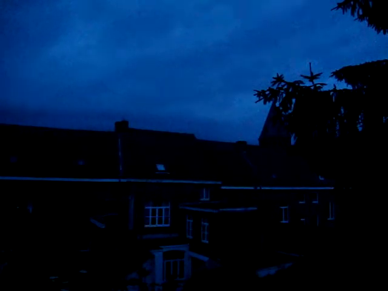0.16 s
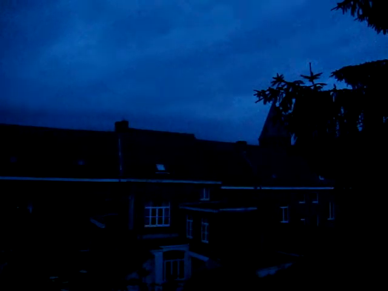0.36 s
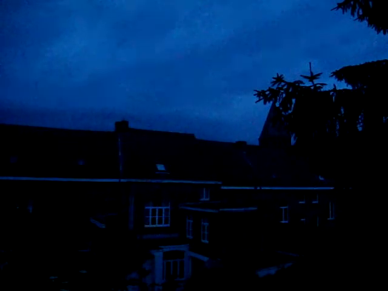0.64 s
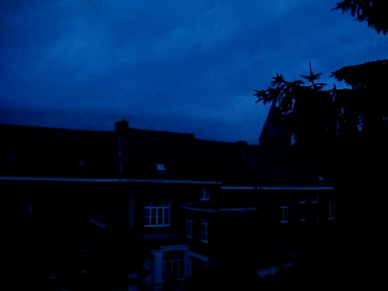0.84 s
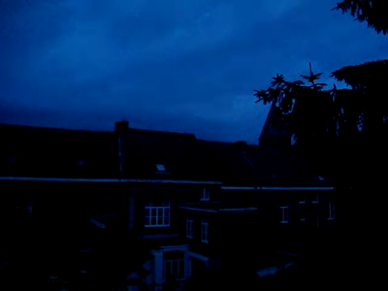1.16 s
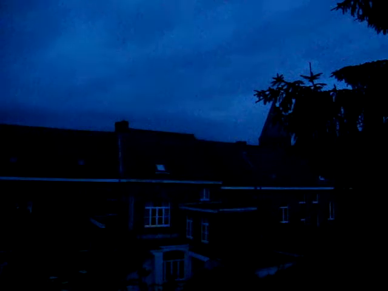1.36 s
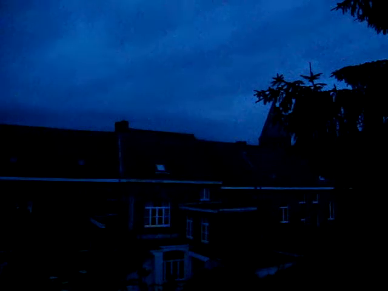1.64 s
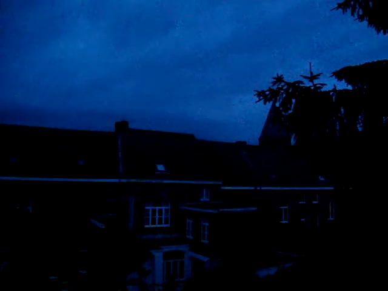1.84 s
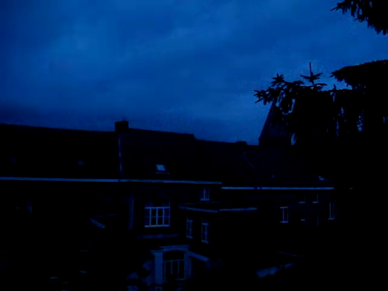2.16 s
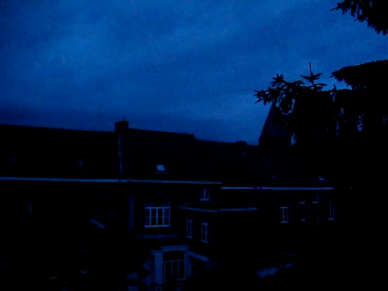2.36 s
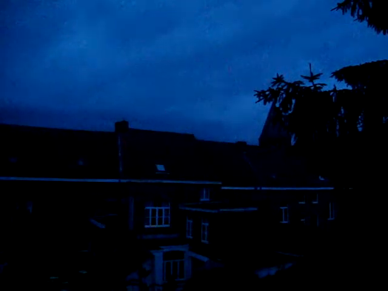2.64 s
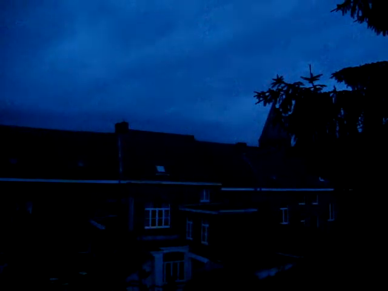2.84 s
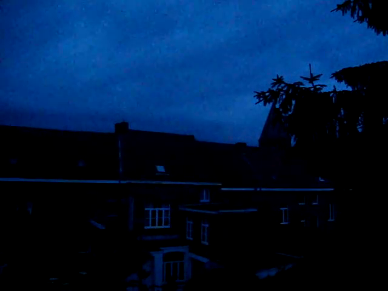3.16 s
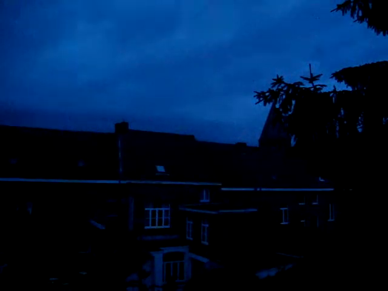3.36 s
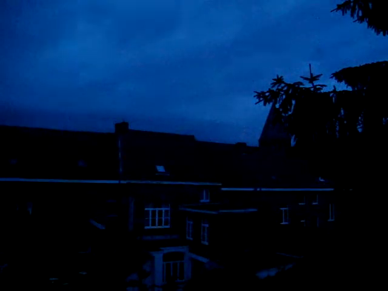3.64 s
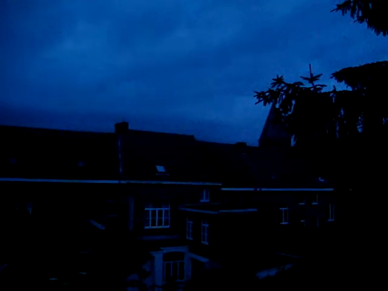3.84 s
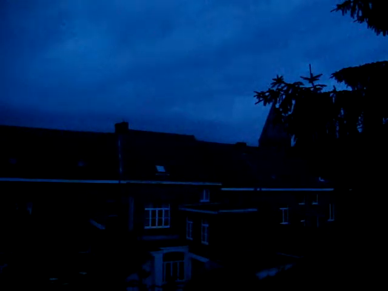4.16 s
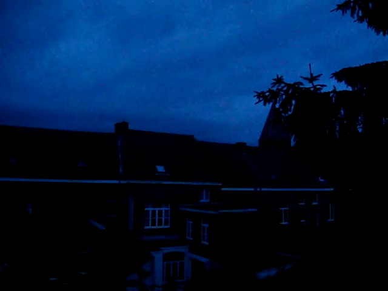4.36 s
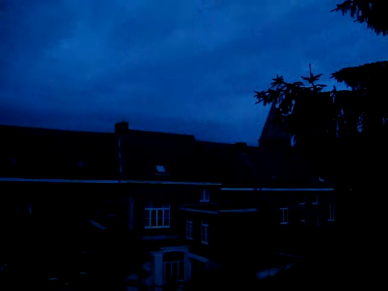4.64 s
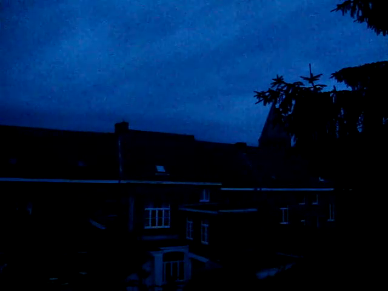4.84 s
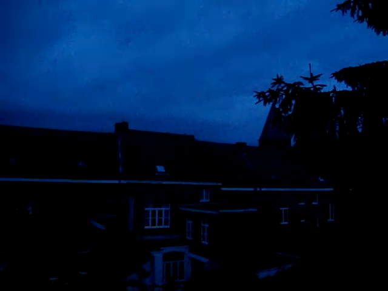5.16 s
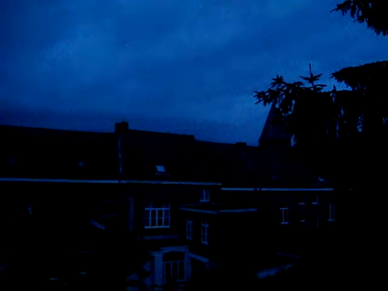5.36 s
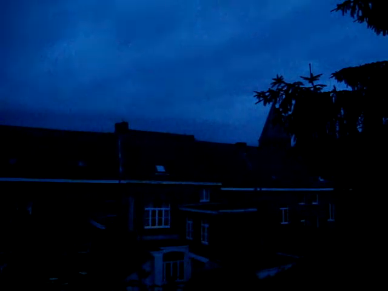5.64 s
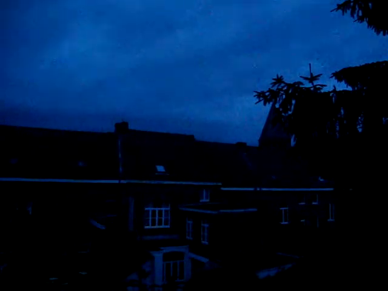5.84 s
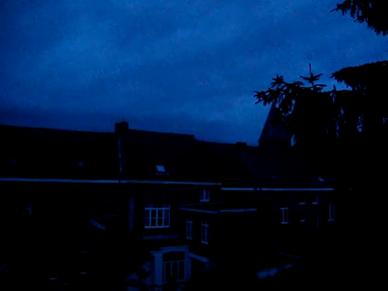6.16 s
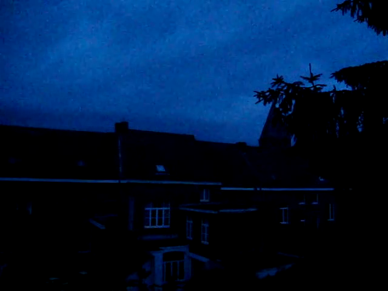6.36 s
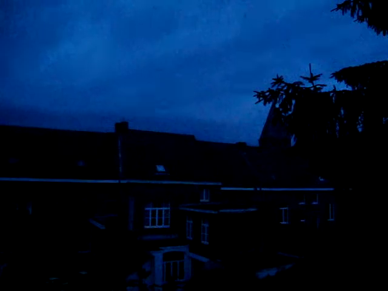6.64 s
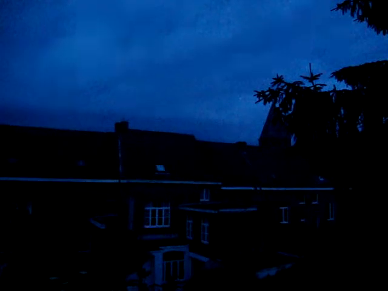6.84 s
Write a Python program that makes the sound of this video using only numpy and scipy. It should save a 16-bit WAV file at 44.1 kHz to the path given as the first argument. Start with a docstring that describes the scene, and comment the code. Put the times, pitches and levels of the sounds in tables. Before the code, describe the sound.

Slow fluty bird whistles, a rapid trill and chirps over quiet rooftops, faint town hum, distant buzzy bird notes, then a loud close tick.

```python
"""A thrush-like bird at dawn over rooftops: slow fluting whistles and fast two-voiced twitter, near one microphone.
Its notes, and the whistles and buzzes of farther birds, are gliding sines with weak overtones.
House walls return a long soft echo, built from bands of dying noise.
Close by something ticks: struck resonant modes with a short crack. Coloured noise with a few narrow hums
makes the town's hum and the microphone's hiss."""
import sys
import numpy as np
from scipy import signal
from scipy.fft import rfft, irfft
from scipy.io import wavfile
from scipy.ndimage import uniform_filter1d

SR = 44100
rng = np.random.default_rng(int(sys.argv[2]) if len(sys.argv) > 2 else 0)


def dump(signal):
    """Clip the signal to [-1, 1] and save it as 16-bit WAV at the path in sys.argv[1]."""
    limited = np.clip(np.atleast_2d(signal).T, -1, 1)
    pcm = np.round(limited * 32767).astype(np.int16)
    wavfile.write(sys.argv[1], SR, pcm)


def level_to_linear(level):
    """Convert decibel levels to linear amplitude factors, elementwise."""
    exponent = np.asarray(level, float) / 20
    return 10 ** exponent


N = 309141   # length of the scene in samples

# steady town hum and microphone hiss, only the shape counts: hz, relative_db (per Hz)
TOWN_COLOUR = [(18, -48), (30, -22), (65, -19), (231, -3), (341, 0.5), (424, -3.5), (838, -6.5),
               (1540, -14), (2270, -12.5), (2760, -17), (8640, -20), (10000, -23), (13000, -83),
               (22000, -120)]
# narrow hums standing out of the town noise: centre_hz, width_hz (standard deviation), boost_db
TOWN_HUMS = [(63.5, 4.6, 4), (130, 4.3, 5), (168, 4.9, 1.5), (235.5, 8, 4.5), (345, 4.2, 3.5),
             (2350, 52, 1)]
TOWN_DB = -54   # rms of the whole town noise

# near bird, long fluting glides, one table a glide: time_s, pitch_hz, level_db
FLUTE_GLIDES = [
    [(0, 2060, -36.5), (0.018, 2122, -33.5), (0.045, 2264, -35), (0.066, 2480, -40.5)],
    [(1.1, 1230, -60.5), (1.14, 1330, -49), (1.18, 1450, -52), (1.215, 1540, -41), (1.225, 1753, -47),
     (1.245, 1860, -38), (1.27, 1980, -47), (1.295, 2040, -43.5), (1.345, 2065, -55)],
    [(1.56, 1830, -48), (1.59, 1810, -36), (1.625, 1791, -39.5), (1.665, 1735, -51.5), (1.715, 1729, -39),
     (1.75, 1715, -47.5), (1.8, 1644, -44.5), (1.825, 1668, -46)],
    [(4.19, 1380, -69), (4.25, 1710, -51), (4.275, 1884, -49), (4.288, 1910, -44.5), (4.33, 1997, -51.5)],
    [(6.295, 2834, -61), (6.36, 2840, -62), (6.44, 2234, -61), (6.51, 2110, -65)],
]
# near bird, plain fluting notes: start_s, length_s, first_hz, last_hz, peak_db
FLUTE_NOTES = [(0, 0.045, 3110, 2730, -49.5), (1.075, 0.071, 2100, 2810, -58.5),
               (1.25, .06, 2770, 2690, -64), (1.357, 0.12, 2194, 2252, -37.5),
               (4.13, 0.11, 1860, 1820, -66), (4.21, .15, 2440, 2670, -61), (4.42, 0.16, 2300, 2294, -49),
               (4.572, 0.065, 2070, 2133, -45.5), (4.64, .095, 2090, 2070, -53.5),
               (6.222, 0.04, 2260, 2680, -65), (6.348, .04, 2250, 1680, -52.5),
               (6.39, .17, 1670, 1640, -68), (6.785, 0.1, 2074, 2030, -61), (6.965, 0.028, 2550, 2680, -60),
               (6.99, 0.029, 2700, 3170, -57)]
# how a plain note runs: peak_at (share of length), start_below_peak_db, end_below_peak_db,
# glide_exponent (under 1 the pitch moves early)
FLUTE_RUN = (0.29, 7.6, 2.7, .9)
TWITTER_RUN = (1.1, 2.9, 3.1, 0.66)
FAR_RUN = (0.46, 6.6, 8.6, 0.453)

# decay of the echo off the walls: hz, t60_s
WALL_DECAY = [(1000, 1.9), (2500, 1.26), (4000, 1.54), (7000, 0.82)]

# ticks close to the microphone: time_s, level_db, brightness_db_per_octave
TICK_STRIKES = [(.077, -47.5, 6), (.094, -46, 7), (0.1265, -38, 6), (6.2732, -36.5, 8), (6.2758, -12, 3.5),
                (6.2768, -16.5, 0.5), (6.2785, -24, -1.5), (6.2925, -53.5, -8), (6.827, -50, -1)]
# what the ticks ring with: pitch_hz, level_db (relative), t60_s
TICK_RINGING = [(440, -10, 0.023), (646, -6.5, 0.022), (926, -5.5, 0.025), (1070, -10.5, 0.015),
                (1360, -5, 0.052), (1653, -2, 0.043), (2250, 0, 0.0085), (2770, -3, 0.0071),
                (3500, -8.5, 0.011), (4400, -11.5, 0.0067), (4900, -7.5, 0.0067), (6400, -20, 0.0034),
                (7020, -17.5, 0.0038), (8020, -20.5, 0.0051), (9200, -18, 0.0024)]

# near bird, thin high notes: start_s, length_s, first_hz, last_hz, peak_db
THIN_NOTES = [(.19, .09, 3260, 3320, -59.5), (.27, 0.022, 4210, 6880, -63), (.302, 0.013, 3276, 3160, -38),
              (.655, 0.047, 4400, 3720, -62), (1.885, 0.0097, 2320, 3265, -50.5),
              (1.897, .007, 4330, 5600, -63), (2.362, .033, 8200, 8600, -62.5),
              (2.485, .027, 8900, 7650, -61), (2.52, .015, 8430, 7110, -62), (2.607, .065, 7600, 8020, -57),
              (2.627, .035, 6700, 6900, -62), (2.699, 0.012, 6700, 6850, -57)]
# near bird, one long dive: time_s, pitch_hz, level_db
LONG_DIVE = [(2.358, 6130, -56), (2.372, 4770, -61), (2.395, 3830, -48.5), (2.415, 3500, -58.5),
             (2.432, 3150, -42), (2.448, 2830, -59)]

# near bird, trill syllables: lowest_point_s, level_db, pitch_lift_hz
TRILL_SYLLABLES = [(.323, -45, 1), (.387, -44.5, 4), (.450, -45, 8), (.514, -44.5, 126), (0.579, -48, 96),
                   (.645, -50.5, 284.5)]
# each side of the syrinx repeats its own figure, before lift:
# from_lowest_point_s, pitch_hz, level_db (relative to the syllable)
SYRINX_FIGURES = [
    [(-.030, 9850, -13), (-.026, 9500, -19), (-.022, 7400, -7.5), (-.018, 4900, -8), (-.013, 3800, -9),
     (-.009, 3200, -6.5), (-.005, 2600, 1), (0, 2250, -2.5), (.004, 2600, -3), (.008, 3380, -11),
     (.012, 4600, -20)],
    [(-.052, 5600, -19), (-.047, 4500, -13), (-.042, 4100, -12), (-.034, 4830, -13.5), (-.027, 5300, -6),
     (-.022, 4330, -11), (-.017, 3200, -3)],
]
# rising lead-in of the upper side, same columns: from_lowest_point_s, pitch_hz, level_db (relative)
UPPER_LEAD_IN = [(-.056, 5380, -17), (-.051, 6000, -8), (-.045, 6010, -8), (-.039, 6700, -14.5),
                 (-.034, 8000, -20)]
# band that beak and throat favour in the quick notes: centre_hz, width_hz, boost_db
BEAK_BAND = (3190, 350, 6)

# near bird, falling warbles: first_crest_s, vibrato_period_s, trough_hz (at the first crest),
# crest_fall_exponent, peak_db (before the vibrato and flutter change the level)
FALLING_WARBLES = [(1.912, .0167, 5300, 1.1, -47), (2.7357, .0192, 6920, 0.62, -51.5)]
# same columns as the plain runs, but the exponent is not used
WARBLE_RUN = (0.63, 9.1, 6.4, 1.)

# near bird, paired chips from both sides of the syrinx: start_s, length_s, lower_voice_db, upper_voice_db
PAIRED_CHIPS = [(2.072, .012, -58, -66), (2.113, 0.016, -51.5, -55), (2.147, .015, -51, -56),
                (2.18, .021, -52, -57), (2.222, 0.016, -51, -56), (2.255, 0.018, -57, -58)]

# farther birds, buzzy notes: start_s, length_s, pitch_hz, spread_hz (standard deviation), level_db
BUZZ_NOTES = [(2.39, 0.043, 7650, 350, -60.5), (4.24, .1, 1693, 140, -61), (4.6, 0.23, 2700, 318, -64.5),
              (4.785, .095, 3270, 221, -53.5), (4.88, .1, 3130, 300, -65), (4.885, 0.097, 2390, 193, -55),
              (5.0, 0.23, 2420, 170, -70.5), (5.05, 0.063, 6450, 200, -65), (5.09, 0.214, 5120, 249, -62.5),
              (5.395, 0.061, 4210, 250, -54.5), (5.4, 0.21, 3180, 454, -65), (5.5, 0.053, 3926, 249, -58),
              (5.62, .16, 3850, 298, -72), (5.63, 0.073, 2570, 243, -66)]
# a farther bird, thin notes: start_s, length_s, first_hz, last_hz, peak_db
FAR_NOTES = [(4.997, 0.0415, 6000, 6810, -58), (5.0, 0.062, 4180, 4520, -51.5),
             (5.055, .03, 4900, 5150, -52.5), (5.1, .04, 4630, 4500, -57), (5.27, 0.045, 2903, 3025, -63),
             (5.315, .04, 6430, 6520, -64), (5.31, 0.089, 4180, 4090, -59.5), (5.4, 0.17, 4080, 4056, -57),
             (5.44, .012, 4000, 3010, -52), (5.535, .008, 3700, 3220, -55), (5.82, .02, 3680, 3090, -61),
             (5.89, 0.017, 3530, 3100, -61.5), (5.962, 0.014, 3520, 3200, -67)]


def at_hz(points, hz):
    """Read a table on a log-frequency axis."""
    table_hz, value = np.transpose(points)
    return np.interp(np.log(hz), np.log(table_hz), value)


def wander(rate_hz):
    """Noise through a double one-pole low-pass; spread 1."""
    r = np.exp(-2 * np.pi * rate_hz / SR)
    settle = 3000   # samples dropped while the filter settles
    slow = signal.lfilter([1], [1, -2 * r, r * r], rng.standard_normal(N + settle))[settle:]
    return slow / slow.std()


def during(curve, t):
    """The stretch of a curve that lies under a note."""
    return curve[np.minimum((t * SR).astype(int), N - 1)]


def swell(share, run):
    """Level in dB along a note: straight up to the peak, straight down from it."""
    peak_at, rise_db, fall_db, _ = run
    return np.interp(share, [0, np.clip(peak_at, .05, .95), 1], [-rise_db, 0, -fall_db])


def plain(notes, run, count=9):
    """Notes that share one swell and one way of gliding from first to last pitch."""
    share = np.linspace(0, 1, count)
    *_, bend = run
    rows = []
    for start_s, length_s, first_hz, last_hz, peak_db in notes:
        pitch_hz = first_hz + (last_hz - first_hz) * share ** bend
        rows.append(np.c_[start_s + share * length_s, pitch_hz, peak_db + swell(share, run)])
    return rows


def unroll(rows, smooth_s=.002):
    """Start time and per-sample columns of a note, corners rounded."""
    s, *columns = np.transpose(rows)
    t = np.arange(max(s[0], 0), s[-1], 1 / SR)
    width = int(smooth_s * SR)
    return [t] + [uniform_filter1d(np.interp(t, s, c), width, mode="nearest") for c in columns]


def add(track, start_s, hz, level_db, second_db, third_db, fade_s=0.001):
    """A syrinx tone: a sine with two weak overtones, faded in and out."""
    i, k = round(start_s * SR), np.arange(len(hz))
    phase = 2 * np.pi * np.cumsum(hz) / SR
    overtones = level_to_linear(second_db) * np.sin(2 * phase) + level_to_linear(third_db) * np.sin(3 * phase)
    tone = np.sin(phase) + overtones * (hz < 5000)   # high pitches stay pure
    fade = np.clip(np.minimum(k, k[::-1]) / (fade_s * SR), 0, 1)
    note = np.sqrt(2) * level_to_linear(level_db) * fade * tone   # level_db is the rms of the sine
    track[i:i + len(hz)] += note[:N - i]


def whistles(notes, second_db, third_db, waver, flutter_db):
    """Syrinx tones along pitch and level tables; both waver slightly."""
    out = np.zeros(N)
    pitch = waver * wander(48)   # share of the pitch
    level = flutter_db * wander(60)
    for rows in notes:
        t, hz, level_db = unroll(rows)
        add(out, t[0], hz * (1 + during(pitch, t)), level_db + during(level, t), second_db, third_db)
    return out


def town():
    """Steady noise with the colour of far traffic and microphone hiss, a few narrow hums standing out."""
    hz = np.maximum(np.fft.rfftfreq(N, 1 / SR), 1)
    colour_db = at_hz(TOWN_COLOUR, hz)
    for centre_hz, width_hz, boost_db in TOWN_HUMS:
        colour_db = colour_db + boost_db * np.exp(-.5 * ((hz - centre_hz) / width_hz) ** 2)
    noise = irfft(rfft(rng.standard_normal(N)) * level_to_linear(colour_db), N)
    return level_to_linear(TOWN_DB) * noise / noise.std()


def flutes():
    """Slow near whistles: almost pure syrinx tones gliding in pitch."""
    notes = FLUTE_GLIDES + plain(FLUTE_NOTES, FLUTE_RUN)
    return whistles(notes, second_db=-37.0, third_db=-33, waver=0.004, flutter_db=2.5)


def walls(x, delay_s=0.0035, near_db=7, near_t60=0.11):
    """Scattered echoes: octave bands of dying noise, each with its own decay; near roofs answer first and loudest."""
    t, response = np.arange(SR) / SR, 0
    for low in (720, 1377, 2800, 5600):
        octave = signal.butter(2, [low, 2 * low], "band", fs=SR, output="sos")
        band = signal.sosfilt(octave, rng.standard_normal(SR))
        t60 = at_hz(WALL_DECAY, low * np.sqrt(2))
        response = response + band * level_to_linear(-60 * t / t60)
    onset = np.clip(t / delay_s - 1, 0, 1)   # silent for one delay, full after two
    near = level_to_linear(near_db - 60 * t / near_t60)
    response = response * onset * (1 + near)
    return signal.fftconvolve(x, response / np.sqrt(np.sum(response ** 2)))[:N]


def ticks(crack_db=-3, crack_t60=0.0094, low_hz=300):
    """Each tick strikes every mode and cracks briefly; brighter ticks favour the upper modes."""
    s, db, tilt = np.transpose(TICK_STRIKES)
    at, out = np.round(s * SR).astype(int), np.zeros(N)
    for k, (hz, mode_db, t60) in enumerate(TICK_RINGING):
        clicks = np.full(N, 1e-18)   # tiny floor keeps the filter out of denormals
        strike_db = db + mode_db + tilt * np.log2(hz / 2500)
        clicks[at] = level_to_linear(strike_db) * (-1) ** k   # neighbouring modes start in opposite sense
        r, w = level_to_linear(-60 / (t60 * SR)), 2 * np.pi * hz / SR
        out += signal.lfilter([0, np.sin(w)], [1, -2 * r * np.cos(w), r * r], clicks)
    clicks = np.full(N, 1e-18)
    clicks[at] = level_to_linear(db + crack_db)
    envelope = signal.lfilter([1], [1, -level_to_linear(-60 / (crack_t60 * SR))], clicks)
    crack = rng.standard_normal(N) * envelope
    out += signal.sosfilt(signal.butter(2, [900, 4000], "band", fs=SR, output="sos"), crack)
    # the ticks carry no bass
    return signal.sosfilt(signal.butter(2, low_hz, "high", fs=SR, output="sos"), out)


def thin_twitter():
    """Thin near notes, chips and the dive: steady syrinx tones with a weak second harmonic."""
    notes = plain(THIN_NOTES, TWITTER_RUN) + chips() + [LONG_DIVE]
    return whistles(notes, second_db=-19, third_db=-38, waver=0.0057, flutter_db=0.5)


def quick_twitter():
    """Trill and warbles, coloured by the resonance of beak and throat."""
    quick = trill() + warbles()
    hz, width_hz, boost_db = BEAK_BAND
    resonance = signal.lfilter(*signal.iirpeak(hz, hz / width_hz, SR), quick)
    return quick + (level_to_linear(boost_db) - 1) * resonance


def trill():
    """Two voices: each side of the syrinx sweeps its own figure in every syllable."""
    notes = [np.array(side) + [s, lift_hz, db] for s, db, lift_hz in TRILL_SYLLABLES for side in SYRINX_FIGURES]
    # every syllable but the first has a lead-in
    notes += [np.array(UPPER_LEAD_IN) + [s, lift_hz, db] for s, db, lift_hz in TRILL_SYLLABLES[1:]]
    return whistles(notes, second_db=-15.5, third_db=-38, waver=0.0168, flutter_db=3.0)


def warbles(flutter_db=3.0):
    """The pitch swings between falling crests and sinking troughs, then slides out."""
    first_crest_hz, last_crest_hz = 7660, 3940
    floor_hz, keeps = 3000, .38   # troughs sink to a floor, keeping this share of their height each turn
    vibrato_turns, lead_s = 4.4, .008
    slide_s, slide_hz_per_s = 0.026, 25000   # the plain downward slide that ends it
    trough_db = 1   # troughs louder and crests softer by this
    out, flutter = np.zeros(N), flutter_db * wander(150)
    for s, period, trough_hz, bend, db in FALLING_WARBLES:
        swinging = vibrato_turns * period
        t = np.arange(-lead_s, swinging + slide_s, 1 / SR)
        turns = np.minimum(t, swinging) / period
        wave = np.cos(2 * np.pi * turns)
        fallen = (np.maximum(turns, 0) / vibrato_turns) ** bend
        crest = first_crest_hz + (last_crest_hz - first_crest_hz) * fallen
        trough = floor_hz + (trough_hz - floor_hz) * keeps ** np.abs(turns)
        slide = slide_hz_per_s * np.maximum(t - swinging, 0)
        hz = trough + (crest - trough) * (1 + wave) / 2 - slide
        level_db = db + swell(t / t[-1], WARBLE_RUN) - trough_db * wave + during(flutter, s + t)
        add(out, s - lead_s, hz, level_db, second_db=-14.5, third_db=-37)
    return out


def chips():
    """Note tables of both syrinx sides: the upper voice holds its pitch; the lower sags and sweeps."""
    lower_hz, upper_hz = 5300, 6430
    sag_hz_per_s = 470   # the lower voice starts lower as the run goes on
    first_sweep_hz, last_sweep_hz = 230., -380.   # and turns from rising to falling
    s, length, lower_db, upper_db = np.transpose(PAIRED_CHIPS)
    start_hz = lower_hz - sag_hz_per_s * (s - s.min())
    end_hz = start_hz + np.linspace(first_sweep_hz, last_sweep_hz, len(s))
    lower = [[(a, hz, db), (b, hz_b, db)] for a, b, hz, hz_b, db in zip(s, s + length, start_hz, end_hz, lower_db)]
    upper = [[(a, upper_hz, db), (b, upper_hz, db)] for a, b, db in zip(s, s + length, upper_db)]
    return lower + upper


def buzzes():
    """Pitch and level shake too fast to follow, which blurs the note into a band."""
    out, shake, flutter = np.zeros(N), wander(203), 3.3 * wander(97)
    for s, length, hz, spread_hz, db in BUZZ_NOTES:
        t = np.arange(s, s + length, 1 / SR)
        pitch_hz = hz + spread_hz * during(shake, t)
        add(out, s, pitch_hz, db + during(flutter, t), second_db=-23, third_db=-41, fade_s=0.0055)
    return out


def far_whistles():
    """Thin gliding syrinx tones of a farther bird."""
    return whistles(plain(FAR_NOTES, FAR_RUN), second_db=-21, third_db=-43, waver=0.008, flutter_db=3.0)


def scene():
    """Each bird direct plus its share of echo, the far ones with more; one capsule feeds both channels."""
    flute, far, buzz = flutes(), far_whistles(), buzzes()
    twitter = thin_twitter() + quick_twitter()
    echo = walls(level_to_linear(-8.5) * flute + level_to_linear(-11) * twitter + level_to_linear(-5) * far + level_to_linear(-4.5) * buzz)
    mono = flute + twitter + far + buzz + echo + ticks() + town()
    return np.array([mono, mono])


def band_limit(x):
    """A steep low-pass at the top of the band."""
    return signal.sosfilt(signal.butter(12, 10270, fs=SR, output="sos"), x)


def record(dry):
    """The finished mix, its top cut steeply above 10170 Hz."""
    low_pass = signal.ellip(10, .3, 60, 10170, fs=SR, output="sos")
    mix = signal.sosfilt(low_pass, dry)
    return band_limit(mix)


dry = scene()
out = record(dry)
dump(out)
```